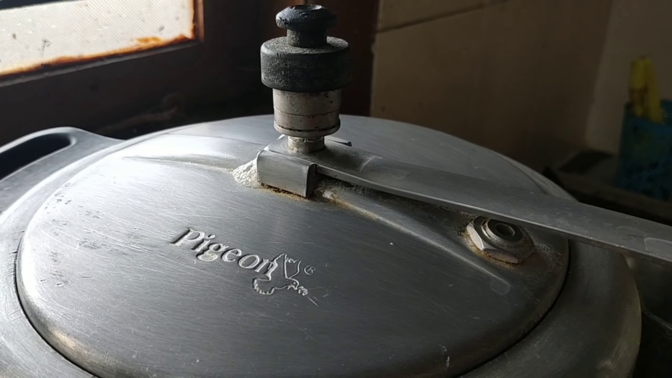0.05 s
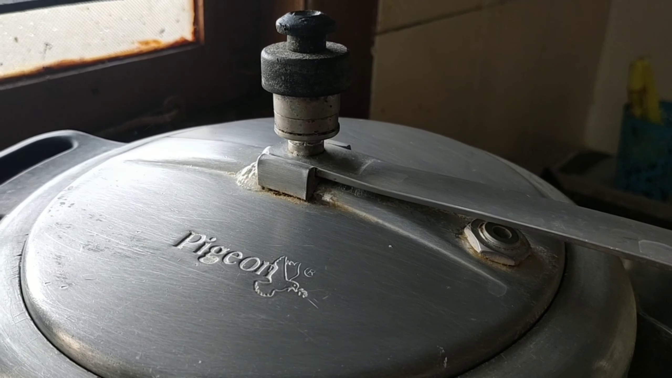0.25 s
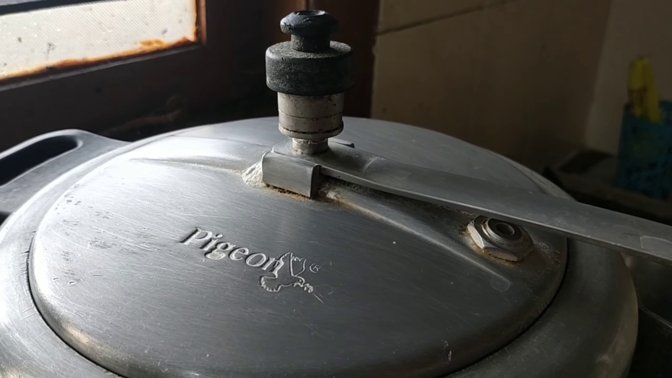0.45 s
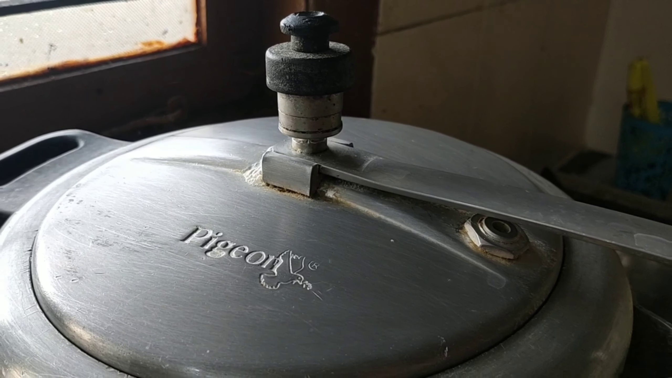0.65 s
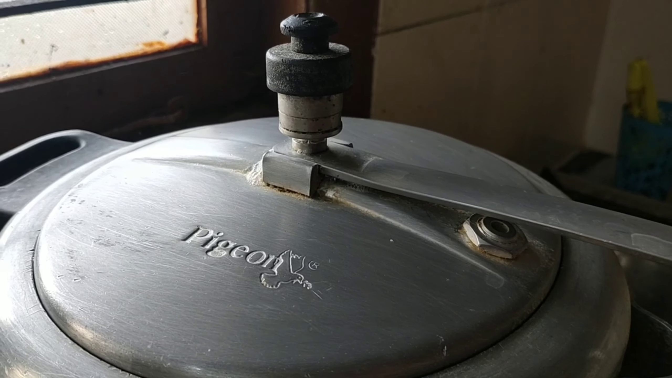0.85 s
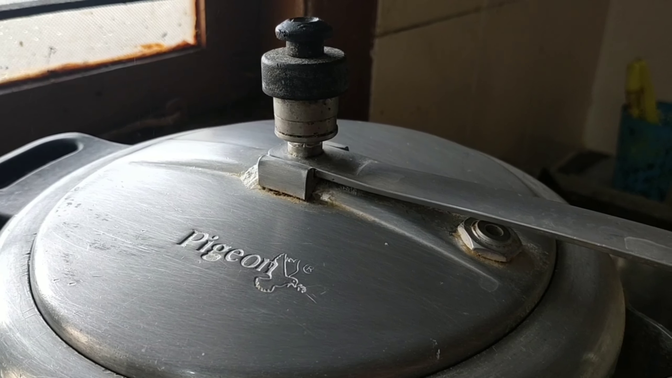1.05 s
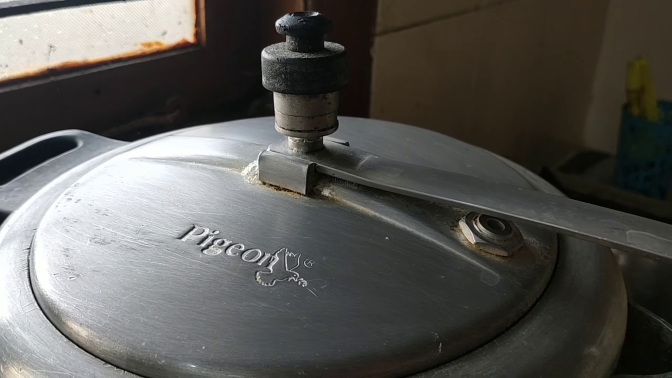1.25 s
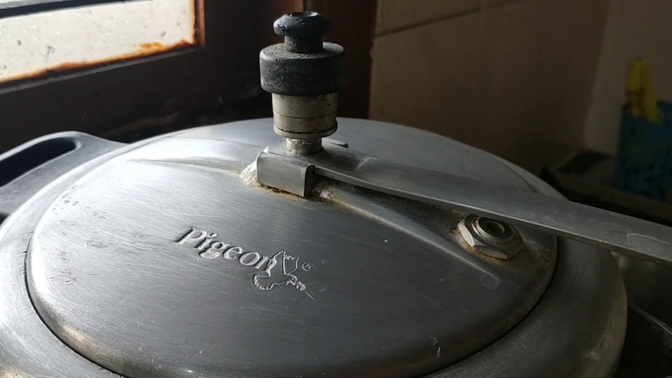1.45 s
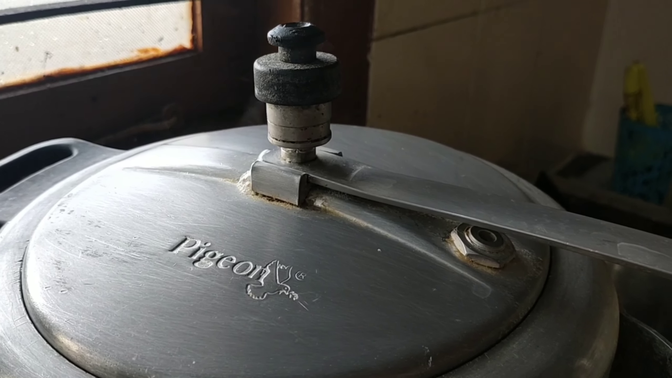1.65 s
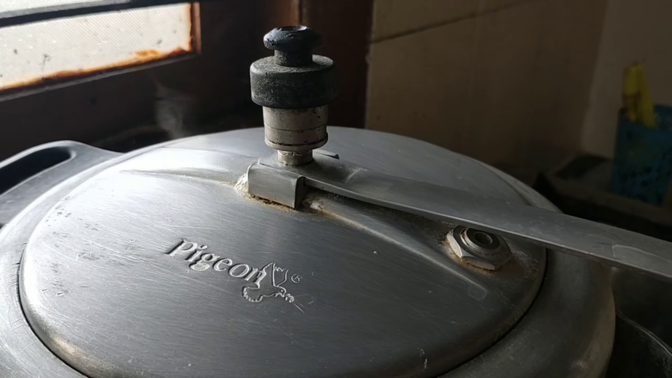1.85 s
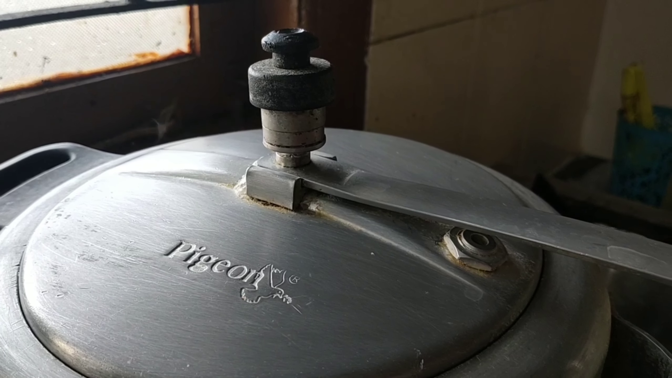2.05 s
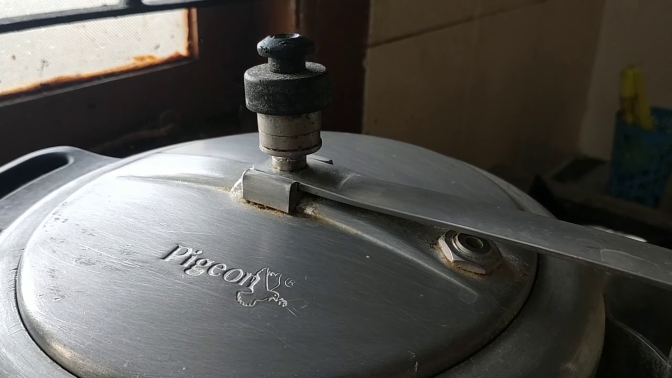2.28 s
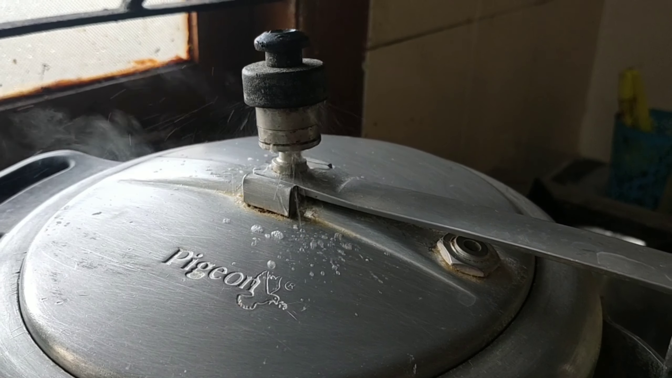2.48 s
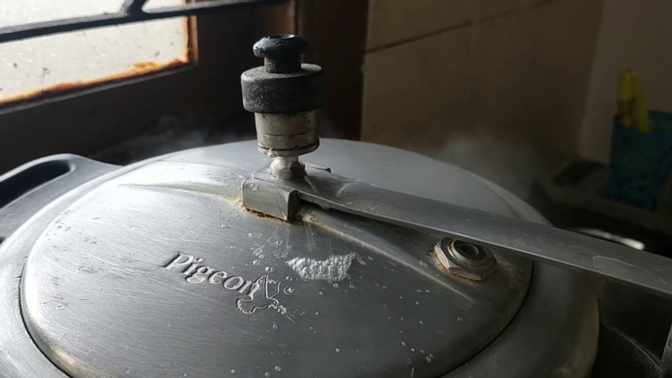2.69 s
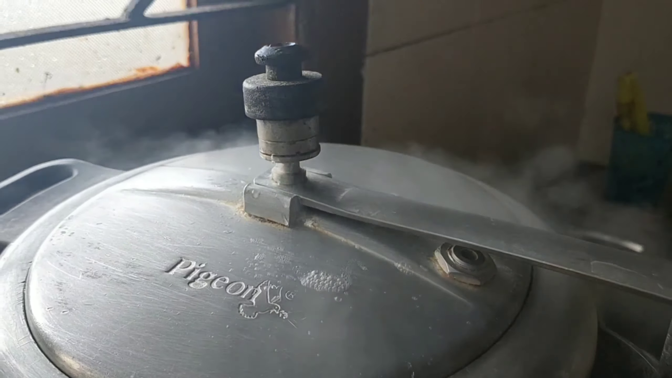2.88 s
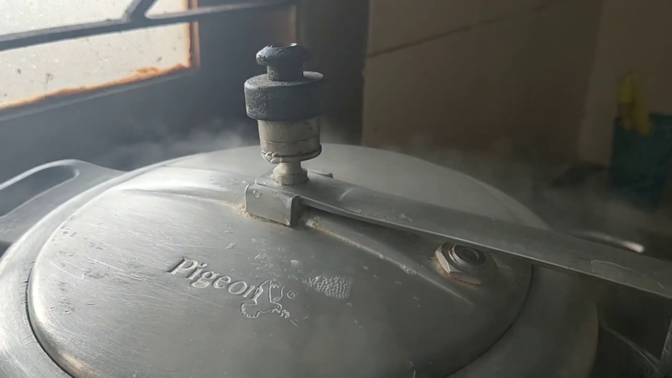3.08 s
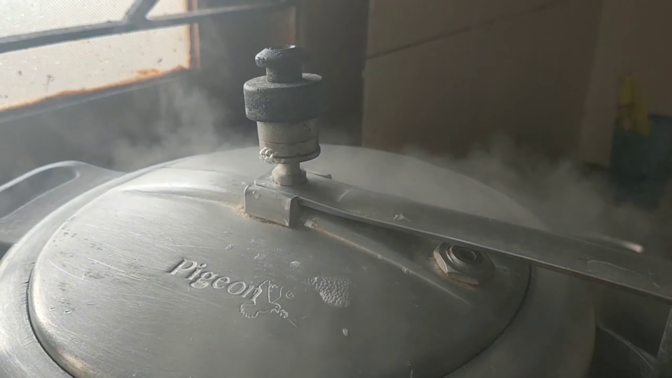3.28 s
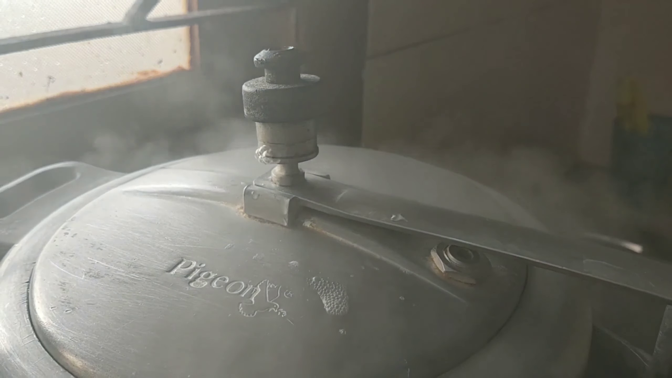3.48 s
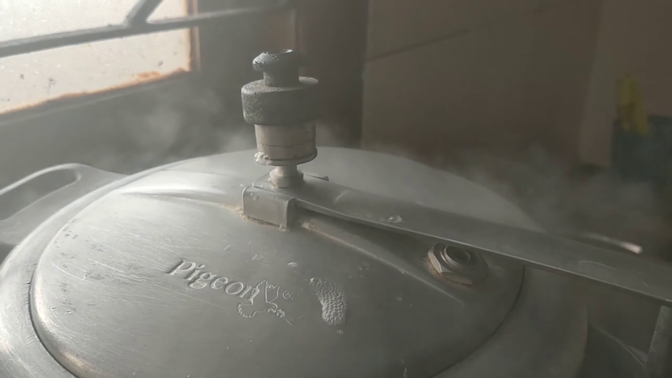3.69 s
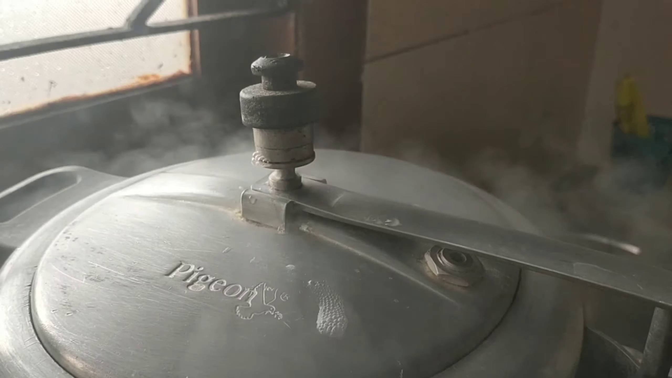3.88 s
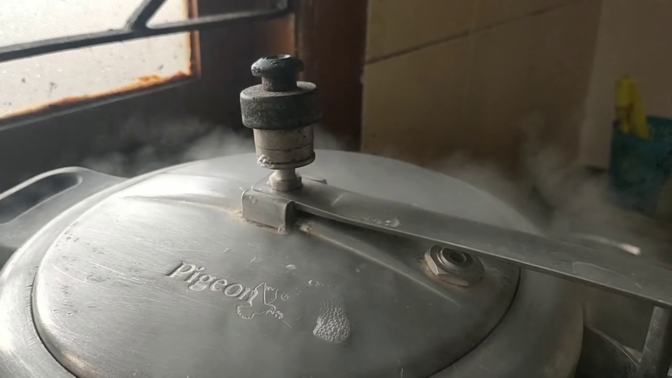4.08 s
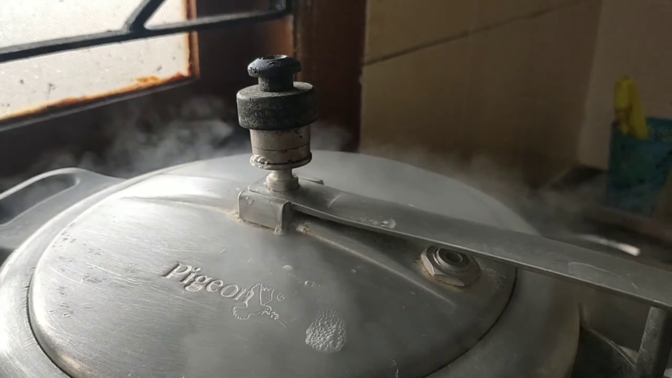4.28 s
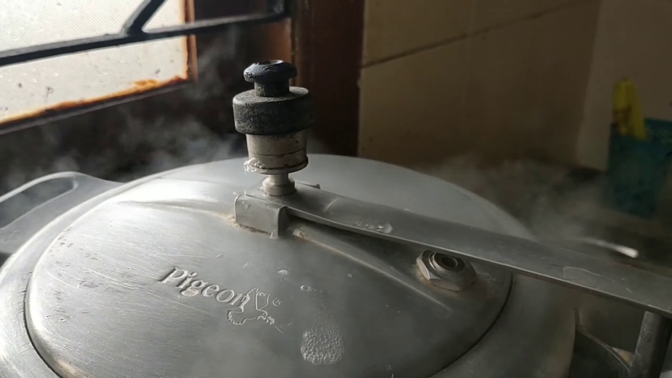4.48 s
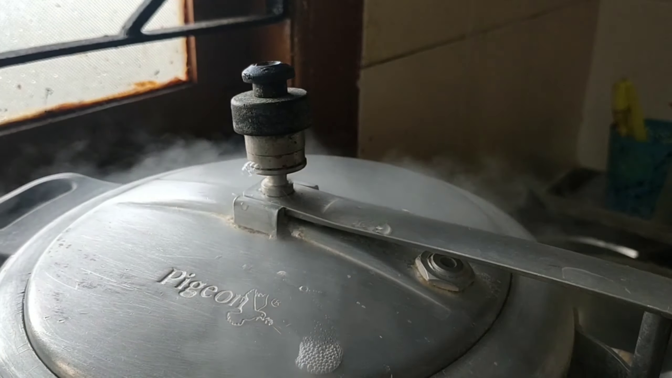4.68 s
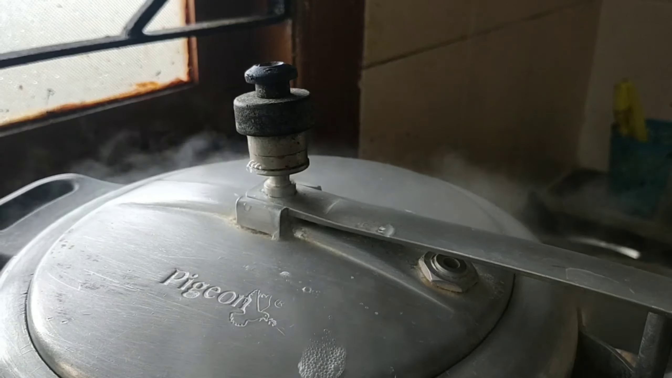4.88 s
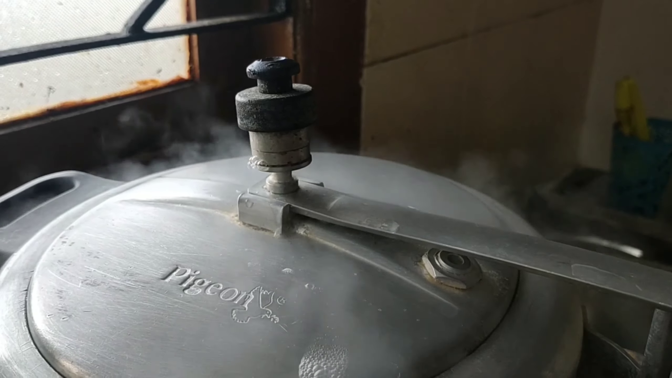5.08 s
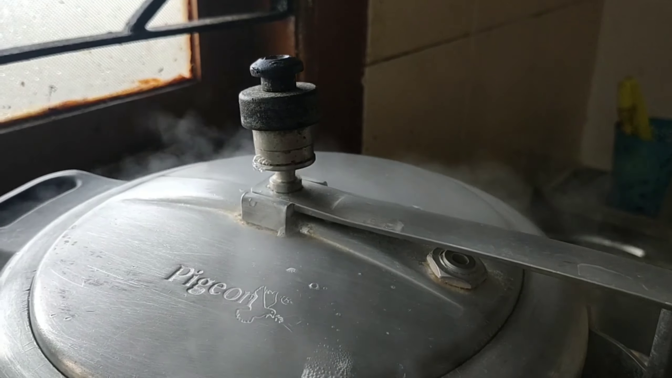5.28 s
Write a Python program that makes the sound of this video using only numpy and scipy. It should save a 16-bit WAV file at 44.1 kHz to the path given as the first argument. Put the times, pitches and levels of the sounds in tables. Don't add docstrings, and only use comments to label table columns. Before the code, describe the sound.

Faint steam leak over a low flame, small spits from a rocking weight, then a sudden wet blast drying into sharp, sustained hissing.

```python
import sys
import numpy as np
from scipy import signal
from scipy.fft import rfft, irfft
from scipy.io import wavfile

SR = 44100
rng = np.random.default_rng(int(sys.argv[2]) if len(sys.argv) > 2 else 0)


def level_to_linear(level):
    exponent = np.asarray(level, float) / 20
    return 10 ** exponent


def file_out(sig):
    cols = np.atleast_2d(sig).T
    lim = np.clip(cols, -1, 1)
    pcm = np.round(lim * 32767).astype(np.int16)
    wavfile.write(sys.argv[1], SR, pcm)


N = 235641
TIME = np.arange(N) / SR
HZ = np.fft.rfftfreq(N, 1 / SR) + 1e-3


def rms_one(x):
    return x / np.sqrt(np.mean(x ** 2) + 1e-20)


def in_time(rows):
    s, *columns = np.transpose(rows)
    return [np.interp(TIME, s, column) for column in columns]


def drift(rate_hz):
    pole = np.exp(-80 * np.pi * rate_hz / SR)
    noise = rng.standard_normal(N // 40 + 2002)
    slow = signal.lfilter([1], [1, -2 * pole, pole * pole], noise)[2000:]
    return np.interp(np.arange(N) / 40, np.arange(len(slow)), rms_one(slow))


def resonance(hz, width_hz):
    return 1 / np.sqrt(1 + (2 * (HZ - hz) / width_hz) ** 2)


def hiss(colour, rings, patchy_db, shape_db):
    hz, db = np.transpose(colour)
    gain = level_to_linear(np.interp(np.log(HZ), np.log(hz), db))
    ridges = sum(level_to_linear(lift_db) * resonance(ring_hz, width_hz) ** 2 for ring_hz, width_hz, lift_db in rings)
    gain = gain * (1 + ridges)
    spectrum = rfft(rng.standard_normal(N)) * gain
    out = 0
    together = drift(3.9)
    half_octave = np.clip(2 * np.log2(HZ / 500), 0, 10)
    for k in range(11):
        band = irfft(spectrum * np.clip(1 - abs(half_octave - k), 0, 1), N)
        flicker_db = patchy_db * (0.29 * together + 1.36 * drift(15.0))
        out = out + band * level_to_linear(flicker_db + shape_db(500 * 2 ** (k / 2)))
    return out / np.sqrt(2 * np.sum(gain ** 2) / N)


# (time [s], level [dB])
SEEP_LEVEL = [
    (0.0, -38.5),
    (0.3, -40.5),
    (0.75, -40.5),
    (1.2, -38.5),
    (1.65, -37.5),
    (1.73, -39.5),
    (2.05, -37),
    (2.25, -37.5),
    (2.46, -33),
]
# (frequency [Hz], density [dB per Hz])
SEEP_SPECTRUM = [(1500, -20.5), (2500, -10.5), (3400, -3.5), (4250, 1), (4600, -2.5), (5200, -5.5),
                 (5950, -9), (6300, -4), (7700, 2.5), (8500, 6), (10600, 5), (12000, 8), (14000, 6.5),
                 (15500, 4)]
# (frequency [Hz], width [Hz], lift [dB])
SEEP_RESONANCES = [(3640, 60, -4), (3830, 60, -3), (4100, 110, -2), (4300, 100, -4), (8640, 170, -2),
                   (12060, 60, -5), (13200, 90, -6), (14560, 110, -6), (15350, 400, -2)]


def seep():
    level_db, = in_time(SEEP_LEVEL)
    lid_start_db, lid_fade_db_per_s = 3.5, 1.34
    lid_db = lid_start_db - lid_fade_db_per_s * TIME
    seated = np.clip((2.52 - TIME) / 0.1, 0, 1)
    noise = hiss(SEEP_SPECTRUM, SEEP_RESONANCES, 0.35, lambda hz: lid_db * (hz < 6000))
    return seated * level_to_linear(level_db) * noise


def kitchen(x):
    t60_s, tail_db, wall_cut_hz = 0.4, -7, 6700
    s = np.arange(SR // 2) / SR
    tail = rng.standard_normal(len(s)) * level_to_linear(-60 * s / t60_s) * (s > 0.002)
    tail = level_to_linear(tail_db) * tail / np.sqrt(np.sum(tail ** 2))
    tail = signal.lfilter(*signal.butter(2, wall_cut_hz, fs=SR), tail)
    return x + signal.fftconvolve(x, tail)[:N]


# (frequency [Hz], density [dB per Hz])
FLAME_SPECTRUM = [(18, -63), (30, -31), (69, -34), (93, -6.5), (140, -8.5), (210, 0), (239, -17), (266, -3),
                  (455, -4.5), (601, -5.5), (3330, -7.5), (4120, -8), (5000, -25), (6500, -37),
                  (11000, -120)]
# (frequency [Hz], width [Hz], level [dB])
ROOM_MODES = [
    (68.6, 6.9, -72.5),
    (100, 14, -69),
    (205, 18, -62.5),
    (363, 8.3, -77),
    (462, 46, -60.5),
    (806, 12, -67),
]


def burner():
    hum = 0
    for hz, width_hz, db in ROOM_MODES:
        mode = irfft(rfft(rng.standard_normal(N)) * resonance(hz, width_hz) ** 2, N)
        hum = hum + level_to_linear(db) * rms_one(mode)
    mains_hz, mains_db, flame_db = 102.5, -59, -45.5
    hum = hum + level_to_linear(mains_db + 2.0 * drift(1.6)) * np.sin(2 * np.pi * mains_hz * TIME)
    flame = level_to_linear(flame_db) * hiss(FLAME_SPECTRUM, [], 0.75, lambda hz: 0)
    duck_db = -4.5
    duck = level_to_linear(duck_db * np.clip((TIME - 2.47) / 0.097, 0, 1))
    return duck * (hum + flame)


# (time [s], level [dB], length [ms], lid band [dB])
PUFFS = [
    (1.29, -40, 33, 15),
    (1.395, -42, 20, 20),
    (1.82, -42, 37, 16.5),
    (1.95, -39.5, 28, 4),
    (2.125, -37.5, 41, 10),
    (2.16, -41.5, 71, 19),
    (2.26, -46, 30, 10),
]


def spits():
    gain = sum(level_to_linear(db) * np.exp(-((TIME - s) / ms * 2000.0) ** 2) for s, db, ms, _ in PUFFS)
    distance_s = [abs(TIME[::64] - row[0]) for row in PUFFS]
    nearest = np.argmin(distance_s, axis=0).repeat(64)[:N]
    return gain, np.array(PUFFS)[nearest, 3]


# (time [s], level [dB], wet surge [0-1])
JET_LEVEL = [
    (2.3, -60, 0.0),
    (2.44, -40, 0.3),
    (2.46, -29.5, 0.8),
    (2.49, -27, 0.8),
    (2.518, -17.2, 0.92),
    (2.6, -17.5, 0.81),
    (2.67, -18, 0.45),
    (2.8, -17.5, 0.02),
    (5.34, -17, 0.1),
]
# (frequency [Hz], density [dB per Hz])
JET_SPECTRUM = [(150, -49), (400, -26), (800, -23), (1500, -20.5), (2300, -17.5), (3500, -13), (4300, -12),
                (4600, -12.5), (5750, -14), (6300, -9.5), (8200, 3), (10700, 1.5), (11800, -2),
                (15400, -1.5)]
# (frequency [Hz], width [Hz], lift [dB])
JET_RESONANCES = [(2590, 80, -6), (3345, 30, -2), (3630, 110, -6), (4100, 60, -6), (4239, 30, -6),
                  (6302, 30, -2), (6550, 90, -6), (7047, 30, -4), (7624, 60, -7), (8137, 50, -5),
                  (9151, 55, -7), (10074, 40, -7), (10438, 40, -8), (11030, 200, -8)]


def jet():
    puff_gain, puff_lid_db = spits()
    level_db, surge = in_time(JET_LEVEL)
    lifting = TIME > JET_LEVEL[0][0]
    surge_body_db, surge_lid_db, steady_lid_db = 11.5, 3.5, 1.4
    lid_db = np.where(lifting, steady_lid_db + surge_lid_db * surge, puff_lid_db)
    open_s, top_steady_db, top_extra_db, top_fade_s = 2.49, 4.3, 5, 0.37
    since_open_s = np.maximum(TIME - open_s, 0)
    top_db = (TIME > open_s) * (top_steady_db + top_extra_db * np.exp(-since_open_s / top_fade_s))

    def shape_db(hz):
        body = surge_body_db * surge * (hz < 2500)
        return body + lid_db * (2500 < hz < 5000) + top_db * (hz > 12000)

    return (level_to_linear(level_db) * lifting + puff_gain) * hiss(JET_SPECTRUM, JET_RESONANCES, 0.48, shape_db)


def eddy(width_ms, lead, rebound):
    ms = np.arange(-350, 500) / SR * 1e3
    snap = 0.5 + 0.5 * np.tanh(ms / (0.091 * width_ms))
    after = np.maximum(ms, 0) / width_ms
    leak = 1.11 * np.exp(-after / 0.98)
    swing = (0.1 + 0.99 * rebound) * after ** 2 * np.exp(-after / 1.12)
    approach = lead * np.exp(np.minimum(ms, 0) / 2.8)
    return snap * (leak - swing) - (1 - snap) * approach


# (time [s], peak [dB], turn [+-1], width [ms])
BIG_EDDIES = [(2.676, -23, 1, 0.29), (2.6939, -23.5, 1, 0.83), (2.739, -23, 1, 0.68),
              (2.7893, -19.5, -1, 0.92), (2.791, -16, 1, 0.94), (2.8224, -23, 1, 1), (2.8664, -20, 1, 1.0),
              (2.8943, -21, 1, 0.7), (2.9121, -14, 1, 0.92), (2.9159, -18, -1, 0.46),
              (3.0511, -19.5, 1, 0.96), (3.0682, -19, 1, 0.87), (3.0744, -15, 1, 1.1),
              (3.0923, -19, -1, 0.5), (3.1047, -20, -1, 0.58), (3.1168, -14, -1, 0.64),
              (3.1247, -15, 1, 0.6), (3.1333, -24, 1, 1.4), (3.185, -22.5, 1, 1.4), (3.2223, -17, 1, 0.33),
              (3.2269, -21, -1, 1.4), (3.231, -20.5, 1, 0.8), (3.273, -20.5, 1, 0.7),
              (3.2897, -19, 1, 0.88), (3.2969, -20.5, -1, 0.89), (3.325, -21.5, 1, 0.87),
              (3.3619, -19.5, -1, 0.88), (3.412, -17.5, 1, 0.93), (3.4693, -20, 1, 0.89),
              (3.44, -29, -1, 0.96)]
# (time [s], peak [dB], turn [+-1], width [ms])
LATE_EDDIES = [(3.5021, -20, -1, 0.93), (3.5103, -14.5, -1, 0.74), (3.5118, -20, 1, 0.61),
               (3.5252, -26, -1, 0.66), (3.657, -18, 1, 0.86), (3.7057, -27, 1, 0.77),
               (3.7144, -32, -1, 0.96), (3.8666, -25, 1, 1.2), (3.902, -29, -1, 0.55),
               (3.964, -22.5, 1, 1.1), (3.977, -25, -1, 0.5), (3.9938, -27, 1, 0.7),
               (4.0533, -26, -1, 0.55), (4.0954, -30, 1, 0.5), (4.096, -20, -1, 0.55),
               (4.0971, -24, 1, 0.5), (4.174, -26.5, -1, 0.71), (4.234, -28, 1, 0.81),
               (4.289, -26, -1, 0.64), (4.4605, -30, 1, 1.5), (4.5331, -21.5, -1, 1.0),
               (4.5778, -25.5, 1, 0.8), (4.6083, -32, 1, 1.7), (4.7504, -29, 1, 0.9),
               (4.778, -22.5, -1, 1.04), (4.9511, -27.5, -1, 0.7), (5.0057, -21.5, 1, 0.95),
               (5.1259, -25, -1, 0.5), (5.129, -24.5, -1, 0.45), (5.2105, -29, -1, 0.44)]
# (time [s], level [dB])
PATTER_LEVEL = [
    (2.6, -49),
    (2.68, -38),
    (2.8, -40),
    (3.05, -40),
    (3.45, -37.5),
    (3.65, -45),
    (4.2, -46),
    (5.34, -46.5),
]


def thumps():
    out = np.zeros(N + 850)
    for s, db, turn, width_ms in BIG_EDDIES + LATE_EDDIES:
        at = round(s * SR)
        out[at:at + 850] += np.sign(turn) * level_to_linear(db) * eddy(width_ms, lead=0.13, rebound=0.12)
    level_db, = in_time(PATTER_LEVEL)
    patter_per_s = 220
    for width_ms in (0.55, 1.1):
        spread_db = 4.1 * np.minimum(rng.exponential(1, N), 2.5)
        sizes = level_to_linear(level_db + spread_db) * rng.choice([-1, 1], N)
        born = (rng.random(N) < patter_per_s / 2 / SR) * (TIME > PATTER_LEVEL[0][0])
        out[:N + 849] += signal.fftconvolve(sizes * born, eddy(width_ms, lead=0.28, rebound=0.1))
    return signal.lfilter(*signal.butter(1, 45, "high", fs=SR), out[350:N + 350])


def scene():
    mono = kitchen(seep() + jet()) + thumps() + burner()
    return np.array([mono, mono])


def top_cut(x):
    return signal.sosfilt(signal.butter(12, 16840, fs=SR, output="sos"), x)


# (time [s], low edge [Hz], high edge [Hz])
STEREO_SPLITS = [(0.15, 13049, 14513), (0.314, 11025, 12446), (0.614, 13049, 14470), (0.615, 9646, 11714),
                 (0.616, 4177, 6287), (0.882, 4220, 6287), (0.917, 8957, 11714), (1.589, 10292, 11714),
                 (1.846, 12360, 13824), (1.868, 4220, 7579), (1.87, 8914, 11068), (3.168, 10292, 11714),
                 (4.142, 7536, 11068), (4.91, 6890, 8268), (4.936, 4177, 5684)]


def record(dry):
    cutoff_hz = 15500
    mid = irfft(rfft(dry[0]) * (HZ < cutoff_hz), N)
    side = np.zeros(N)
    frame_hz = np.fft.rfftfreq(2048, 1 / SR)
    turn = np.pi / 4 * signal.windows.kaiser_bessel_derived(2048, 4 * np.pi)
    for s, low_hz, high_hz in STEREO_SPLITS:
        centre = round(s * SR)
        at = slice(centre - 1024, centre + 1024)
        inside = (frame_hz > low_hz + 60) * (frame_hz < high_hz - 20)
        band = irfft(rfft(mid[at]) * inside)
        mid[at] += band * (np.cos(turn) - 1)
        side[at] += np.roll(band, 211) * np.sin(turn)
    return top_cut(np.array([mid + side, mid - side]))


dry = scene()
out = record(dry)
file_out(out)
```